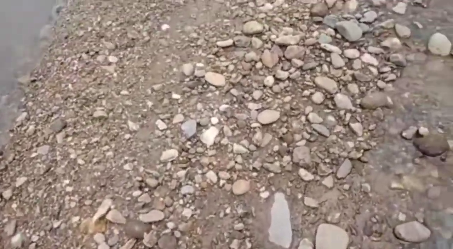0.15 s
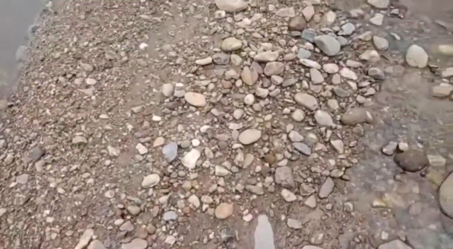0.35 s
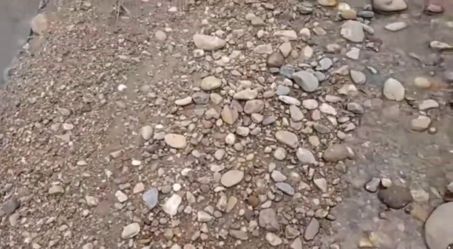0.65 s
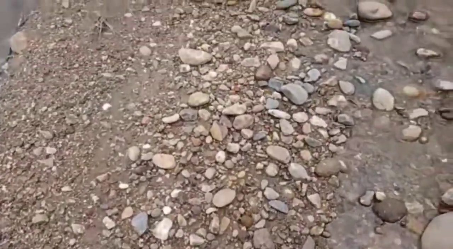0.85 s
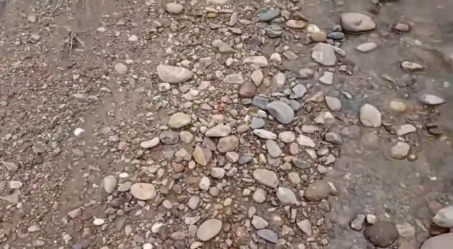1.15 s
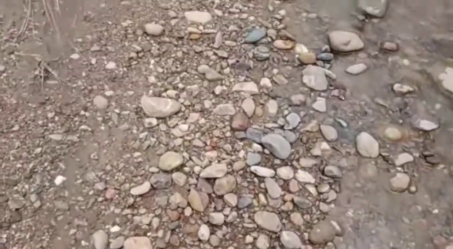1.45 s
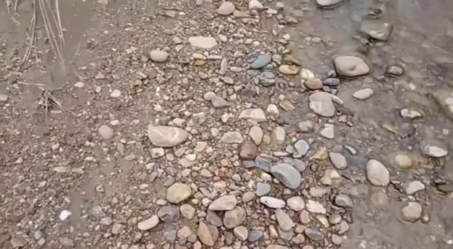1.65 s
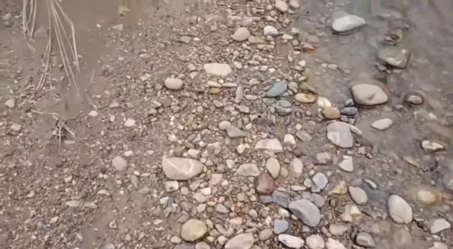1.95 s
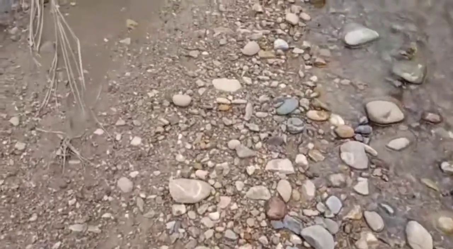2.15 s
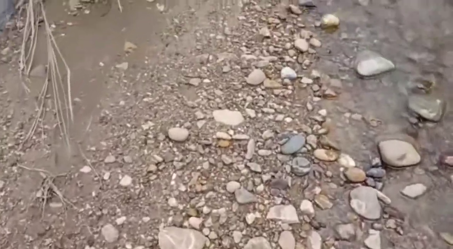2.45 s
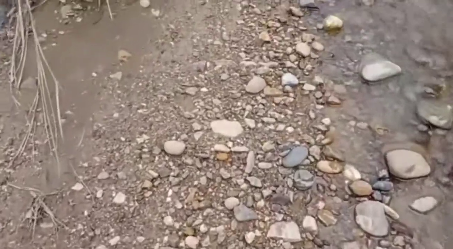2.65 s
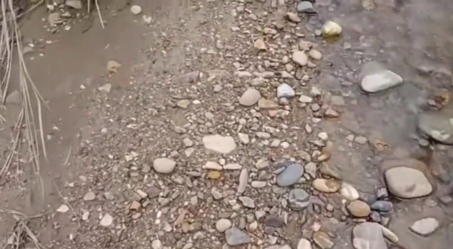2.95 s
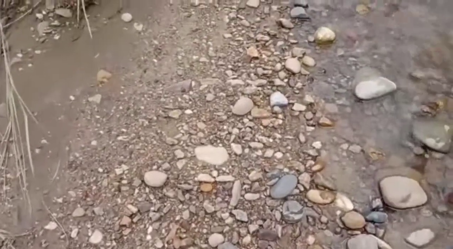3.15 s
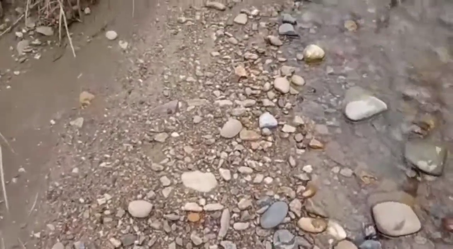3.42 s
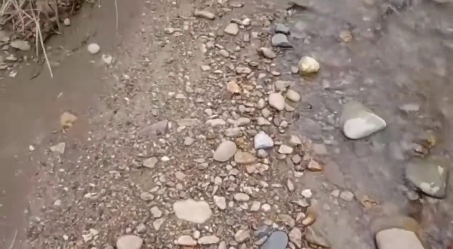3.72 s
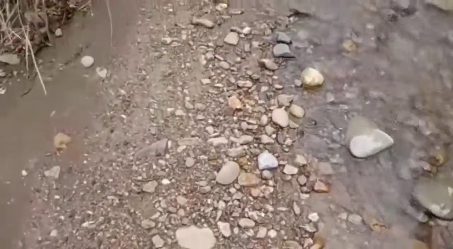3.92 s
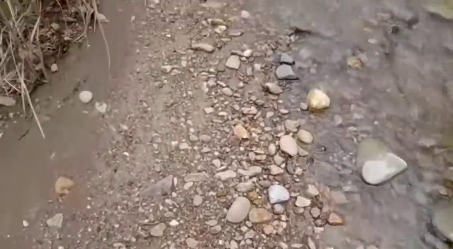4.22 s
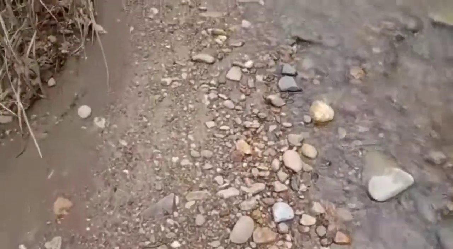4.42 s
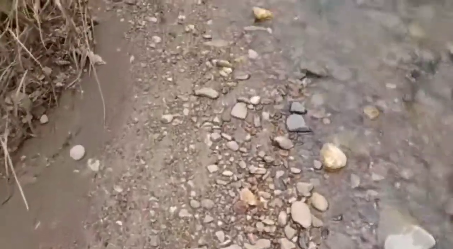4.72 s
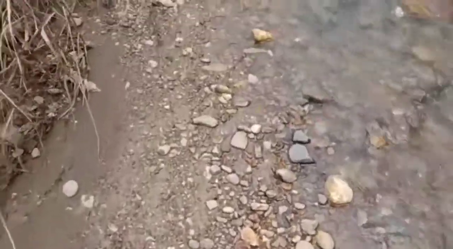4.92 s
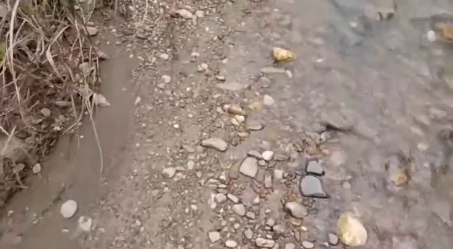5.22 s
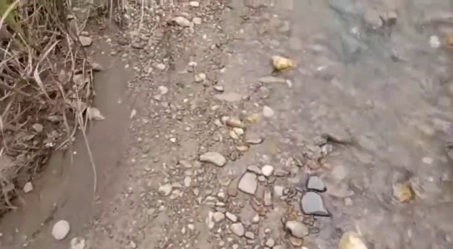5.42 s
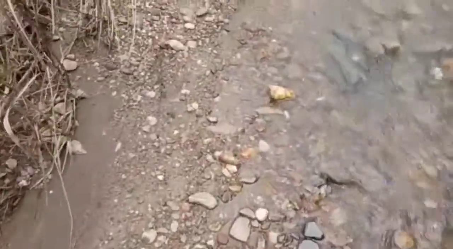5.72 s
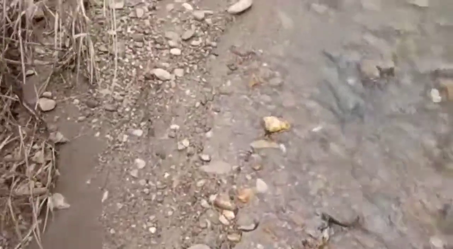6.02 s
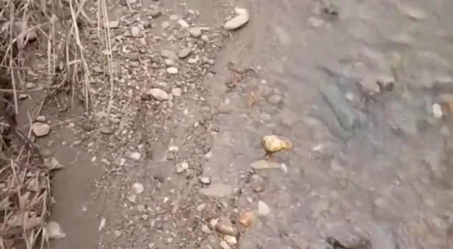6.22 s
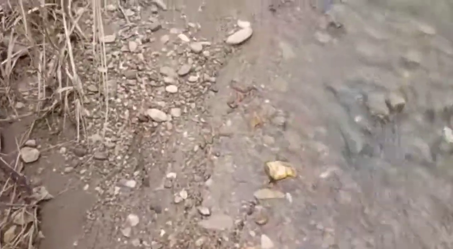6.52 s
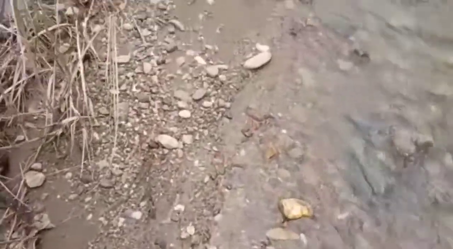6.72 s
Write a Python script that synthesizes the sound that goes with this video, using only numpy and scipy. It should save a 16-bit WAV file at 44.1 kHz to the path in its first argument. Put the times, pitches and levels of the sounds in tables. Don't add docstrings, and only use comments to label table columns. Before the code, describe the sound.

Shallow river water washes steadily while someone walks slowly on wet gravel, stones crunching, slipping and knocking sharply close to the microphone.

```python
import sys
import numpy as np
from scipy import signal
from scipy.fft import rfft, irfft, next_fast_len
from scipy.io import wavfile
from scipy.ndimage import uniform_filter1d, minimum_filter1d

SR = 44100
rng = np.random.default_rng(int(sys.argv[2]) if len(sys.argv) > 2 else 0)


def file_out(sig):
    cols = np.atleast_2d(sig).T
    lim = np.clip(cols, -1, 1)
    pcm = np.round(lim * 32767).astype(np.int16)
    wavfile.write(sys.argv[1], SR, pcm)


def field_ratio(decibels):
    return 10 ** (np.asarray(decibels, dtype=float) / 20)


N = 302967


def rms_one(x):
    return x / np.sqrt(np.mean(x ** 2) + 1e-20)


def in_time(rows):
    s, *columns = np.transpose(rows)
    return [np.interp(np.arange(N) / SR, s, column) for column in columns]


def colour(x, spectrum):
    size = next_fast_len(len(x) + 4096)
    hz, level_db = np.transpose(spectrum)
    bins_hz = np.fft.rfftfreq(size, 1 / SR)
    log_gain = np.log(field_ratio(np.interp(np.log(bins_hz + 1), np.log(hz), level_db)))
    cepstrum = irfft(log_gain, size)
    cepstrum[1:size // 2] *= 2
    cepstrum[size // 2 + 1:] = 0
    return irfft(rfft(x, size) * np.exp(rfft(cepstrum)), size)[:len(x)]


def split_at(x, hz):
    below = signal.sosfiltfilt(signal.butter(4, hz, fs=SR, output="sos"), x)
    return below, x - below


def band(x, order, low_hz, high_hz):
    return signal.sosfilt(signal.butter(order, [low_hz, high_hz], "band", fs=SR, output="sos"), x)


def drift(rate_hz):
    r = np.exp(-2 * np.pi * rate_hz / SR)
    wander = signal.lfilter([1], [1, -2 * r, r * r], rng.standard_normal(N + SR))
    return rms_one(wander[SR:])


def grains(per_s, spread_db):
    sizes = field_ratio(spread_db * np.minimum(rng.exponential(1, N), 4)) * rng.choice([-1, 1], N)
    return sizes * (rng.random(N) < per_s / SR)


def rings(clicks, low_hz, high_hz, cycles, count):
    out, dealt = 0, rng.integers(0, count, N)
    for k, hz in enumerate(np.geomspace(low_hz, high_hz, count)):
        r = field_ratio(-60 * hz / (cycles * SR))
        w = 2 * np.pi * hz / SR
        mine = clicks * (dealt == k) + 1e-18
        ringing = signal.lfilter([0, np.sin(w)], [1, -2 * r * np.cos(w), r * r], mine)
        out = out + ringing * np.sqrt(1 - r)
    return rms_one(out)


def add(out, s, sound):
    i = round(s * SR)
    out[i:i + len(sound)] += sound[:N - i]


def ping(t, hz, t60, soft=0.00012):
    return np.sin(2 * np.pi * hz * t) * field_ratio(-60 * t / t60) * (1 - np.exp(-t / soft))


# time in seconds, wash level in dB.
RIFFLE_NEARNESS = [(0.0, -37), (0.69, -39), (1.05, -37), (2.1, -38), (2.45, -38), (2.64, -34.5),
                   (3.25, -38.5), (3.71, -36.5), (4.23, -38), (4.82, -38), (5.26, -37), (5.75, -37),
                   (6.26, -38), (6.87, -39)]
# frequency in Hz, level in dB per Hz.
RIVER_COLOUR = [(18, -55), (30, -39), (43, -27), (98, -12.5), (272, -14), (551, -1), (775, 1), (1890, -3),
                (3200, -3.5), (3640, -5.5), (4380, -13.5), (6160, -25), (8000, -29.5), (11300, -21.5),
                (15800, -45.5)]


def river():
    wash_db, = in_time(RIFFLE_NEARNESS)
    spray_db = 1.2 * wash_db + 0.47 * np.arange(N) / SR
    far = rng.standard_normal(N) * field_ratio(0.5 * drift(18))
    riffle = rings(grains(1500, spread_db=3.5), 256.7, 5030, cycles=18.8, count=24)
    riffle = rms_one(np.diff(riffle, prepend=0) + 0.12 * riffle)
    water = field_ratio(-33) * rms_one(colour(far + 0.5 * riffle, RIVER_COLOUR))
    wash, spray = split_at(water, 6000)
    wash_swing_db = wash_db - np.median(wash_db)
    spray_swing_db = spray_db - np.median(spray_db) + 1.8 * drift(25)
    return wash * field_ratio(wash_swing_db) + spray * field_ratio(spray_swing_db)


def gurgle():
    return field_ratio(-58.5) * rings(grains(70, spread_db=2.0), 314, 550, cycles=39.0, count=10)


SETTLE_DB = -38.5
# start in seconds, end in seconds, crunch level at start in dB, at end in dB.
FOOT_LOADS = [(0, .2, -35.5, -33), (.31, .36, -32, -27), (.85, 1.151, -44, -31), (1.305, 1.902, -44, -36),
              (2.05, 2.265, -44, -31), (2.282, 2.417, -24.5, -24), (2.496, 2.555, -18, -17.5),
              (2.576, 2.574, -14, -13), (2.654, 2.672, -26, -25), (2.726, 2.752, -30, -23.5),
              (3.3, 3.604, -38.5, -29.5), (3.64, 3.852, -27.5, -32.5), (3.89, 4.054, -30.5, -31.5),
              (4.15, 4.55, -33.5, -36), (4.611, 4.78, -26.5, -29), (4.795, 4.905, -26, -25.5),
              (4.914, 4.974, -24, -11.5), (4.98, 5.088, -21, -28), (5.093, 5.332, -27.5, -37),
              (5.604, 5.678, -34, -23.5), (5.69, 5.798, -21, -33), (5.83, 5.967, -33.5, -31.5),
              (5.992, 6.2, -32.5, -38), (6.512, 6.6, -35.5, -36), (6.618, 6.684, -27, -22)]


def load():
    rise_db_per_s, fall_db_per_s = 700, 750
    t = np.arange(0, N / SR + 1, 0.001)
    power = field_ratio(2 * SETTLE_DB)
    for start, end, first_db, last_db in FOOT_LOADS:
        level_db = np.interp(t, [start, end], [first_db, last_db])
        edge_db = rise_db_per_s * np.maximum(start - t, 0) + fall_db_per_s * np.maximum(t - end, 0)
        power = power + field_ratio(2 * np.maximum(level_db - edge_db, -99))
    return np.interp(np.arange(N) / SR, t, 10 * np.log10(power))


# frequency in Hz, level in dB per Hz.
GRAVEL_COLOUR = [(410, -42.5), (700, -14), (945, -13.5), (1340, -9.5), (1660, -14.5), (2900, -6.5),
                 (3310, -4), (3870, -3.5), (4890, -15), (5800, -35.5), (11400, -22), (15800, -43)]


def crunch(crunch_db):
    per_s = 2500 * field_ratio(4.0 * drift(60))
    cracks = rms_one(grains(per_s, spread_db=3.0))
    pebbles = rings(grains(per_s, spread_db=2.5), 1160, 12100, cycles=21.0, count=18)
    body, grit = split_at(rms_one(colour(cracks + 0.48 * pebbles, GRAVEL_COLOUR)), 6500)
    return field_ratio(crunch_db - 6.0) * body + field_ratio(0.63 * crunch_db - 19.0) * grit


SLIP_GAP_S = 0.006


def knocks(table, broad_share):
    out, t = np.zeros(N), np.arange(int(0.02 * SR)) / SR
    lead, skid = 0.0008, t[t < 0.006]
    slots = (np.transpose(table)[0] / SLIP_GAP_S * 2).astype(int)
    rattles = rng.standard_normal((int(N / SR / SLIP_GAP_S * 2), len(skid)))[slots]
    lower_hz = 1250 + 600 * rng.random(N)[slots]
    rattles = rattles * field_ratio(np.where(skid < lead, -30000 * (lead - skid), -9000 * (skid - lead)))
    broad = colour(np.r_[1, 0 * t], GRAVEL_COLOUR)[:len(t)]
    broad = signal.sosfilt(signal.butter(3, 2200, "high", fs=SR, output="sos"), broad)
    broad = broad_share * broad / np.linalg.norm(broad)
    for (s, peak_db, hz, low_db), rattle, low_hz in zip(table, rattles, lower_hz):
        ring = ping(t, hz, 0.013)
        hit = np.convolve(rattle, ring / np.linalg.norm(ring) + broad)[:len(t)]
        low = np.convolve(rattle, ping(t, low_hz, 0.016))[:len(t)]
        knock = hit / np.abs(hit).max() + field_ratio(low_db - 3.5) * low / np.abs(low).max()
        add(out, max(s - lead - 0.0006, 0), field_ratio(peak_db) * knock)
    return band(out, 6, 1000, 5400)


def slips(crunch_db):
    from_db, range_db = -35, 12.5
    s = np.arange(0, N / SR - 0.05, SLIP_GAP_S)
    late, luck, larger = rng.random((len(s), 3)).T
    size, pitch, low = rng.standard_normal((len(s), 3)).T
    s = s + SLIP_GAP_S * late
    load_db = crunch_db[(s * SR).astype(int)]
    peak_db = np.minimum(load_db + 6 + 4.5 * np.minimum(size, 1), -9)
    hz = 3750 * 2 ** (0.13 * pitch - 0.48 * (larger < 0.2))
    rows = np.c_[s, peak_db, hz, -13 + 5 * low]
    return knocks(rows[luck < (load_db - from_db) / range_db], broad_share=1.0)


def ticks(table, upper_hz):
    out, t = np.zeros(N), np.arange(int(0.014 * SR)) / SR
    puffs = rng.standard_normal((len(table), len(t))) * field_ratio(-60 * t / 0.009)
    upper = 0.6 * ping(t, upper_hz, 0.0021, soft=0.00005)
    for (s, peak_db, hz), puff in zip(table, puffs):
        snap = np.convolve(puff, ping(t, hz, 0.0045, soft=0.00005) + upper)
        add(out, s, field_ratio(peak_db - 1.5) * snap / np.abs(snap).max())
    return band(out, 2, 4000, 15500)


def sand(crunch_db):
    swing_db = crunch_db - SETTLE_DB
    per_s = 45 * field_ratio(0.5 * swing_db)
    s = np.flatnonzero(rng.random(N) < per_s / SR)
    size, pitch = rng.random((2, N))[:, s]
    peak_db = -47.5 + 0.16 * swing_db[s] - 3.5 * np.log(size + 0.04)
    return ticks(np.c_[s / SR, peak_db, 7800 * 2 ** (0.7 * pitch)], upper_hz=11500)


def chips(table):
    s, peak_db = np.transpose(table)[:2]
    hz = 6500 * 2 ** (0.95 * rng.random(len(s)))
    return ticks(np.c_[s, -36.5 + 0.34 * peak_db, hz], upper_hz=11000)


# start in seconds, peak in dB,
# ring in Hz.
LONE_PEBBLES = [(0.0772, -20, 3600), (0.1308, -12, 1750), (0.165, -16.5, 3800), (0.3518, -20, 2410),
                (1.0214, -19, 3760), (1.064, -15.5, 2440), (1.0871, -14, 5150), (1.505, -16, 2700),
                (1.6534, -16, 2300), (1.7292, -17, 2300), (1.778, -20, 3460), (1.8932, -18, 2590),
                (2.4635, -13, 2840), (2.587, -15, 3720), (2.612, -15, 3120), (2.662, -14, 3600),
                (3.2973, -18, 3650), (3.509, -18, 2940), (3.6382, -13, 3570), (3.8802, -10, 3460),
                (3.9448, -13, 3180), (4.184, -16.5, 3700), (4.627, -13.5, 3790), (4.833, -11, 3740),
                (5.2101, -7, 4520), (5.328, -15.5, 4560), (5.521, -17, 2400), (5.6668, -15, 3600),
                (5.759, -10.5, 3870), (5.8413, -13.5, 2980),
                (5.8713, -14.5, 3880),
    (5.8828, -17, 3630),
    (5.9087, -12, 3800),
    (5.946, -12.5, 2590),
    (5.966, -15.5, 3780),
    (6.192, -8, 3480),
    (6.519, -13.5, 3330),
    (6.5275, -16, 3100),
    (6.546, -21, 2980),
    (6.5824, -17, 2010),
                (0.0358, -18.5, 3040), (.3337, -27, 3500), (0.8804, -22, 3210), (1.382, -21.5, 3400),
                 (1.5852, -25, 3340), (2.279, -18, 3810), (2.4894, -14.5, 2940), (3.8993, -19, 3280),
                 (4.532, -20.5, 3770), (4.6114, -15, 4140), (4.6567, -16, 3700), (4.8578, -14, 3700),
                 (4.8777, -12, 3700), (5.5933, -21.5, 3060), (5.6342, -14, 3730)]


def lone_pebbles():
    rows = [(*row, -18.5) for row in LONE_PEBBLES]
    return knocks(rows, broad_share=0.87) + chips(rows)


# start in seconds, peak in dB, pitch in Hz.
DROPLETS = [(0.0737, -35, 10500), (1.0075, -33, 11000), (1.0829, -29, 11800), (1.1418, -33, 10800),
            (2.409, -30, 9240), (2.49, -34, 9450), (2.881, -33, 10200), (2.9467, -31, 9300),
            (3.0123, -26, 10500), (3.0577, -28, 10400), (3.3258, -29, 11000), (3.4905, -34, 11500),
            (3.5244, -31, 10600), (3.8791, -32.5, 11400), (4.0951, -34, 9500), (4.215, -36, 8900),
            (4.926, -25, 10000), (4.9646, -27, 11500), (5.1292, -30, 10800), (5.6655, -37, 11000),
            (5.6875, -27, 11800), (5.777, -35, 9500), (5.8426, -33, 9640), (5.9065, -34, 10800),
            (5.9449, -32, 10300), (6.0846, -36, 10600), (6.519, -27.5, 8950), (6.8059, -34, 10800)]


def droplets():
    return ticks(DROPLETS, upper_hz=11100)


# start in seconds, peak in dB, pitch in Hz.
CHIP_SNAPS = [(0.1296, -36, 4820), (1.0855, -16, 4960), (2.355, -25, 4810), (2.379, -27, 4900),
              (2.4892, -24, 4760), (2.5606, -31, 4760), (2.7467, -33, 4870), (4.6099, -22, 4900),
              (4.9237, -20, 4840), (4.9521, -22, 4900), (5.1622, -30, 5100), (5.21, -25, 4790),
              (5.6625, -21, 4800), (5.688, -16, 4800), (5.7254, -19, 4830), (5.8421, -18, 4760),
              (5.906, -20.5, 5100), (5.9449, -28.5, 4730), (6.5184, -27.5, 4740), (6.6199, -19, 4860)]


def snaps():
    return field_ratio(-3.5) * ticks(CHIP_SNAPS, upper_hz=5514)


# start in seconds, peak in dB, pitch in Hz, t60 in seconds,
# rise in octaves.
BUBBLES = [(.645, -26, 302, 0.019, 0.68), (2.916, -30, 690, 0.051, 0.038), (3.038, -38, 286, 0.19, 0.11),
           (3.042, -31, 624, 0.048, 0.085), (3.158, -30.5, 598, 0.17, 0.92), (3.185, -30, 2060, .05, 0.06),
           (4.625, -33, 470, 0.13, 0), (5.135, -22.5, 787, 0.063, 0.13), (5.417, -30, 644, 0.046, 0.11),
           (5.74, -25, 803, 0.059, 0.23), (1.512, -29, 884, .06, 0.14), (6.65, -20, 1590, 0.042, 0.2),
           (3.045, -33, 4460, 0.073, 0.17), (4.188, -42, 14500, .012, 0)]


def glugs():
    out = np.zeros(N)
    for s, level_db, hz, t60, rise in BUBBLES:
        t = np.arange(int(t60 * SR)) / SR
        turns = np.cumsum(hz * 2 ** (rise * t / (0.33 * t60))) / SR
        swell = field_ratio(-60 * (t / t60) ** 1.3) * (1 - np.exp(-t / 0.0013))
        add(out, s, field_ratio(level_db) * np.sin(2 * np.pi * turns) * swell)
    return out


# start in seconds, peak in dB, ring in Hz, lower ring in dB.
STONES = [(2.306, -8, 4200, -30), (2.356, -13.5, 3380, -26), (2.3804, -13.5, 4830, -3),
          (2.4137, -16, 4080, -3), (2.4942, -11, 2860, -14), (2.5107, -8, 3940, -12), (2.521, -8, 3830, -8),
          (2.541, -5, 2220, -18), (2.553, -6, 2100, -10), (2.5601, -4.5, 3230, -24),
          (2.5633, -1, 3510, -6.5), (2.5706, 1.5, 3340, -8), (2.7303, -12.5, 3230, 1),
          (2.736, -14, 3640, -3.5), (2.749, -2, 4100, -20), (2.7523, -2.5, 3590, -28),
          (3.6627, -9, 3540, -1.5), (4.92, -9, 2750, -18), (4.927, -2, 3880, -32), (4.955, -7, 3750, -28),
          (4.964, 0.5, 3870, -29), (4.9724, 0, 3640, -22), (4.9828, -8, 3870, -13),
          (5.685, -1.5, 3600, -30), (5.6882, -4.5, 3240, -31), (5.6935, -4, 4200, -31),
          (5.7258, -4.5, 4400, -35), (6.6211, -4, 3750, -30), (6.6542, -20, 3120, 6),
          (6.679, -11, 3480, -6)]


def stone_knocks():
    return knocks(STONES, broad_share=0.54) + chips(STONES)


def scatter(x):
    t = np.arange(int(0.08 * SR)) / SR
    tail = rng.standard_normal(len(t)) * field_ratio(-60 * t / 0.034) * (t > 0.001)
    return x + field_ratio(-12.5) * signal.fftconvolve(x, tail / np.linalg.norm(tail))[:N]


def scene():
    water = river() + gurgle() + glugs()
    crunch_db = load()
    bed = crunch(crunch_db) + slips(crunch_db) + sand(crunch_db)
    stones = lone_pebbles() + stone_knocks()
    steps = bed + stones + droplets() + snaps()
    return (water + scatter(steps))[None]


def limit(x):
    room = np.minimum(1, 0.93 / (np.abs(x) + 1e-9))
    return x * uniform_filter1d(minimum_filter1d(room, size=121), size=61)


def roll_off(x):
    return signal.sosfilt(signal.butter(12, 15980, fs=SR, output="sos"), x)


def record(dry):
    over_db = np.maximum(20 * np.log10(np.abs(dry) + 1e-9) + 9, 0)
    ramp_db = 30 * np.arange(N) / SR
    held_db = np.maximum.accumulate(over_db + ramp_db, axis=1) - ramp_db
    duck_db = signal.lfilter([0.004], [1, -0.996], held_db)
    ducked = dry * field_ratio(-0.3 * duck_db)
    ducked = signal.sosfilt(signal.butter(2, 31, "high", fs=SR, output="sos"), ducked)
    ducked = signal.sosfilt(signal.ellip(10, 0.5, 60, 15850, fs=SR, output="sos"), ducked)
    mix = limit(ducked)
    return roll_off(mix)


dry = scene()
out = record(dry)
file_out(out)
```